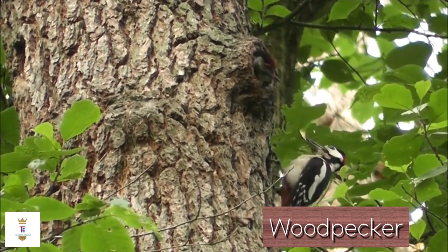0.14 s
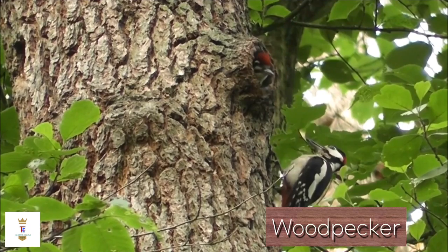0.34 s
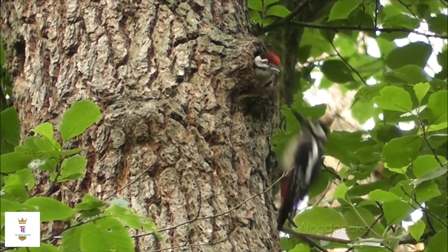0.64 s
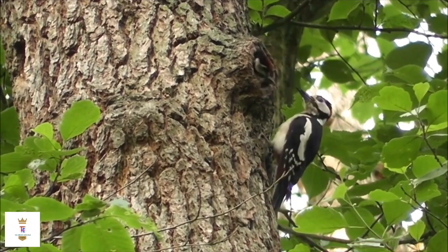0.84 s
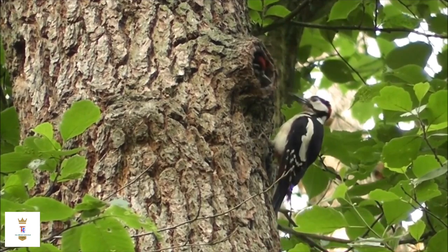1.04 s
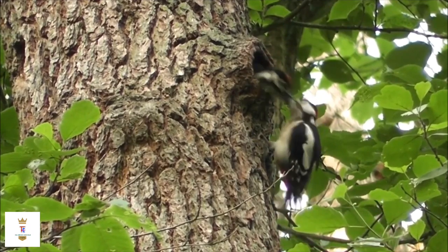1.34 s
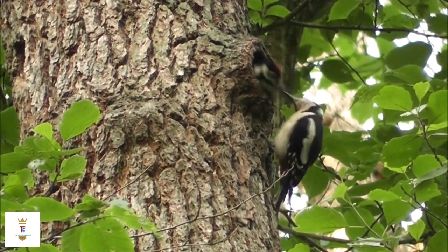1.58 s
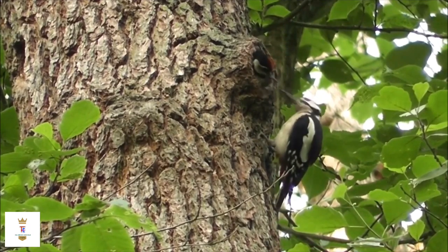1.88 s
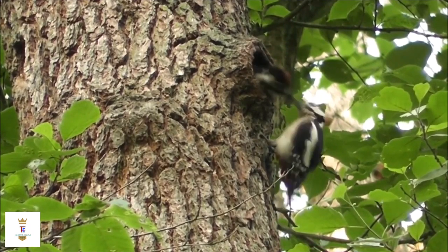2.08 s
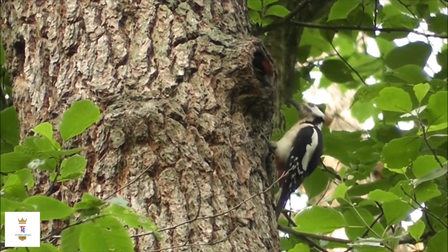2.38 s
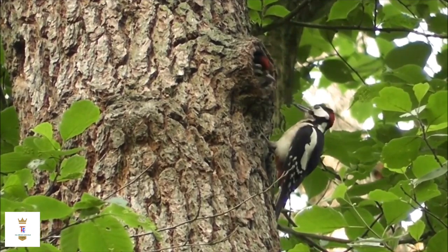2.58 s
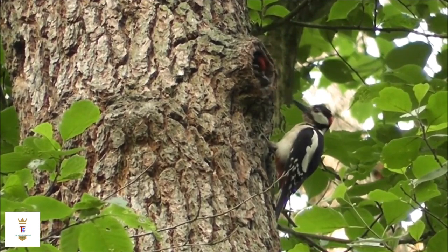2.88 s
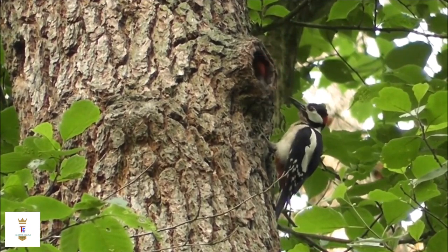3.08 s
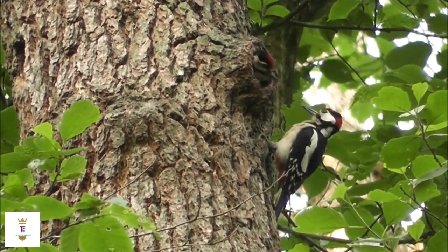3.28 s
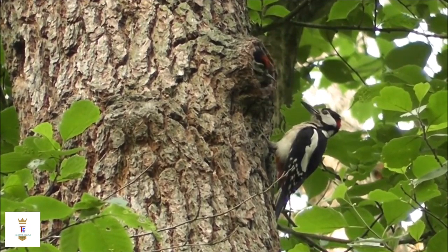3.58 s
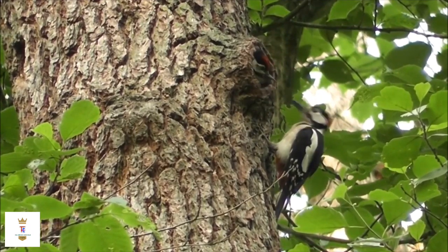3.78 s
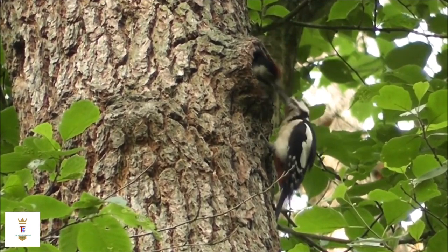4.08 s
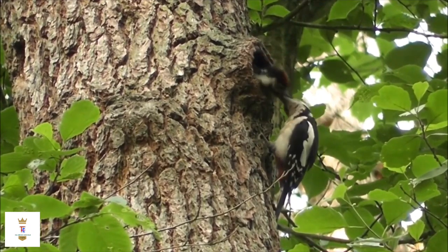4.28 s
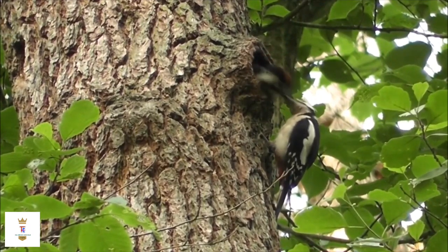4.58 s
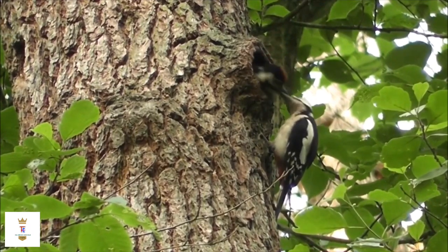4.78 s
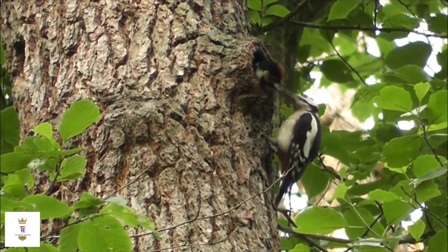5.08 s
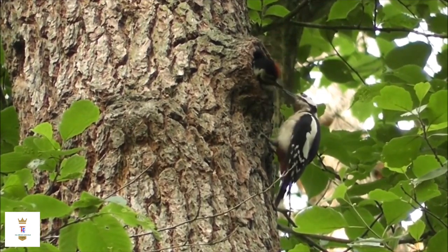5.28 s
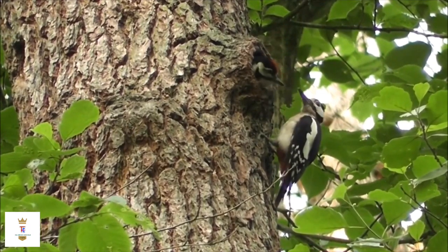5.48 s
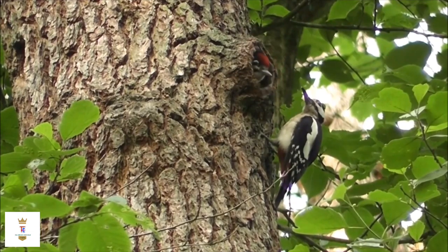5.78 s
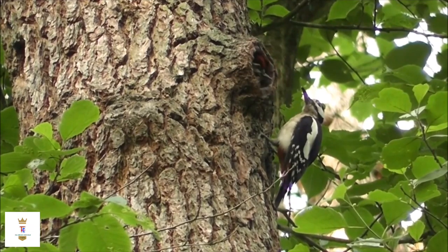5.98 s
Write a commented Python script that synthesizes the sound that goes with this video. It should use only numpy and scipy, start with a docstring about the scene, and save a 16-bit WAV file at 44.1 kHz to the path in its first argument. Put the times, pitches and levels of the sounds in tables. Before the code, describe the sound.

A woodpecker chick begs with sharp, rapid, repeated calls in a wood, while a distant songbird whistles over softly rustling leaves.

```python
"""Woodpecker chick in a wood

A chick begs from its nest hole, nearly four calls a second: syrinx tension swells and lets go, so each
sharp call arches in pitch. Now and then its voice cracks. Further off a songbird whistles a phrase and
later a few faint chirps. Trunks and foliage scatter every call into a long tail over a soft hush."""
import sys
import numpy as np
from scipy import signal
from scipy.fft import rfft, irfft, next_fast_len
from scipy.io import wavfile
from scipy.ndimage import map_coordinates

SR = 44100
rng = np.random.default_rng(int(sys.argv[2]) if len(sys.argv) > 2 else 0)


def output_pcm(signal):
    """Save a mono or channel-first signal as 16-bit PCM at the path in sys.argv[1].

    Samples are clipped to [-1, 1] before scaling.
    """
    pcm = np.clip(np.atleast_2d(signal).T, -1, 1) * 32767
    wavfile.write(sys.argv[1], SR, np.round(pcm).astype(np.int16))


N = 270774
TOP_HZ = 15750  # upper band limit
CALL_SAMPLES = int(.2 * SR)  # room for one whole call

# Resonances of throat and bill: (frequency [Hz], gain [dB])
THROAT = [(500, -39), (1150, -10), (2400, -2.5), (3500, -0.5), (5000, -6.5), (5800, -3), (6900, 0),
          (7800, 0), (10000, -4.5), (12500, -12), (15500, -26), (19000, -52)]


def amp(db):
    """Decibels to amplitude ratio."""
    return 10 ** (np.asarray(db) / 20)


def unit(x):
    """Normalisation to rms 1."""
    return x / np.sqrt(np.mean(x ** 2) + 1e-20)


def along(points, hz):
    """Interpolation of a table on a logarithmic frequency axis."""
    frequencies, values = np.transpose(points)
    return np.interp(np.log(hz + 1), np.log(frequencies + 1), values)


def wobble(t, rate):
    """Random modulation: a smooth curve with rate knots a second."""
    return map_coordinates(rng.standard_normal(512), [(t - t[0]) * rate], mode="wrap")


def filtered(x, response):
    """Linear filtering: the spectrum times a frequency response."""
    size = next_fast_len(N + SR // 2)
    return irfft(rfft(x, size) * response(np.fft.rfftfreq(size, 1 / SR)), size)[..., :N]


def add(track, s, sound):
    """Superposition of a sound on the track from time s."""
    start = max(round(s * SR), 0)
    part = track[..., start:start + sound.shape[-1]]
    part += sound[..., :part.shape[-1]]


def air(spectrum, db, sway_db):
    """Partial coherence: swaying outdoor noise, partly alike on left and right."""
    # Likeness of the two sides: (frequency [Hz], coherence [ratio])
    coherence = [(30, .9), (90, 0.88), (180, 0.88), (350, 0.4), (700, 0.03), (1400, 0.72), (3000, 1),
                 (8000, 1), (13000, 0.39)]

    def response(hz):
        angle = np.arccos(np.clip(along(coherence, hz), -1, 1)) / 2
        return amp(along(spectrum, hz)) * [np.cos(angle), np.sin(angle)]

    mid, side = filtered(rng.standard_normal((2, N)), response)
    sway = wobble(np.arange(N) / SR, 3.004)
    return unit(np.array([mid + side, mid - side])) * amp(db + sway_db * sway)


def hush():
    """Broadband noise: distant rumble and leaves are independent, so their powers add."""
    # Distant rumble: (frequency [Hz], relative spectral density [dB])
    rumble = [(15, -44), (25, -17), (85, 0), (156, -5.5), (189, 0.5), (252, 0), (320, -3), (355, -1),
              (432, -5.5), (900, -19), (1170, -93), (1980, -120)]
    # Rustling leaves: (frequency [Hz], relative spectral density [dB])
    leaves = [(200, -19), (600, -2.5), (1200, -4.5), (2400, 1.5), (4000, 0), (7000, -4.5), (10000, -28),
              (15500, -23)]
    return air(rumble, db=-64.5, sway_db=1.0) + air(leaves, db=-55.5, sway_db=1.7)


def in_wood(ahead, all_round, near_db, near_t60, far_db):
    """Scattering: sound sent ahead gains quick echoes off bark and leaves; that sent all round, a tail."""
    # Reverberation of the wood: (frequency [Hz], time to fall 60 dB [s])
    decay = [(1000, 0.13), (3000, 1), (5000, 0.68), (7500, 0.6), (10000, 0.56), (15000, 0.49)]
    # Initial spectrum of the tail: (frequency [Hz], relative level [dB])
    colour = [(1000, 3.5), (2400, -2.5), (3500, 1.5), (5000, 6.5), (7500, 0), (10000, -3), (15000, -3)]
    hz, t, noise = signal.stft(rng.standard_normal(SR * 3 // 4), SR, nperseg=256)
    tail_db = along(colour, hz)[:, None] - 60 * t / along(decay, hz)[:, None]
    far = signal.istft(noise * amp(tail_db), SR, nperseg=256)[1]
    t = np.arange(len(far)) / SR
    # cubed noise: a few strong echoes among many weak
    scatter = lambda t60: rng.standard_normal(len(t)) ** 3 * amp(-60 * t / t60)
    at_level = lambda echo, db: amp(db) * echo / np.linalg.norm(echo)
    near = at_level(scatter(near_t60), near_db) + at_level(scatter(t60=.0067), db=-15)
    near[0] += 1  # the direct path
    tail = at_level(far * (1 - np.exp(-t / .0073)), far_db)
    mid = signal.fftconvolve(ahead, near) + signal.fftconvolve(all_round, tail)
    side = signal.fftconvolve(ahead, at_level(scatter(near_t60), near_db - 22))
    return np.array([mid + side, mid - side])


def songbird(gain_db=.3, drop_s=.025, climb_share=.52, swell_db=3):
    """Gliding pure tones; the direct-to-reverberant ratio falls for fainter, more distant notes."""
    # Slurs: (time [s], length [s], start pitch [Hz], target pitch [Hz], relative level [dB])
    slurs = [(0, .02, 5900, 5500, -46), (.095, .045, 3360, 3520, -41.5), (.138, .022, 3560, 3680, -32),
             (.227, .03, 2795, 3150, -39), (.63, .057, 1950, 1760, -53), (.782, .07, 2825, 3130, -35),
             (.855, .05, 3180, 2776, -38), (.94, .12, 3230, 3530, -38), (1.115, .06, 5600, 4010, -40.5),
             (1.268, .055, 3800, 3345, -37), (1.483, .068, 3847, 2815, -37),
             (1.55, 0.052, 2780, 3090, -37.5), (1.754, .072, 3950, 3646, -33),
             (1.9, 0.11, 2900, 3340, -35.5), (2.072, 0.036, 3780, 3480, -33.5),
             (2.255, 0.049, 2803, 2808, -35), (2.31, 0.064, 2860, 3330, -39),
             (5.55, 0.028, 3860, 3745, -53), (5.6, .076, 5730, 5520, -56), (5.605, 0.053, 2950, 3180, -59),
             (5.845, .055, 5000, 3880, -50), (6.04, 0.025, 4000, 3880, -51)]
    out = np.zeros((2, N))
    for s, length, start_hz, target_hz, db in slurs:
        t = np.arange(int(length * SR)) / SR
        slide_s = drop_s if target_hz <= start_hz else climb_share * length
        settled = 1 - np.exp(-(t / slide_s) ** 2)
        pitch = start_hz + (target_hz - start_hz) * settled
        phase = 2 * np.pi * np.cumsum(pitch * (1 + .003 * wobble(t, 225))) / SR
        swell = signal.windows.tukey(len(t), .25) * amp(swell_db * (settled - 1))
        whistle = swell * amp(2.6 * wobble(t, 119)) * np.sin(phase)
        echo_db = .28 * (-33.5 - db)  # grows as a note falls below the nearest ones
        note = in_wood(whistle, whistle, near_db=echo_db - 8.5, near_t60=.15, far_db=echo_db - 3)
        add(out, s, amp(db + gain_db) * note)
    return out * amp([[-.5], [.5]])  # slightly to the right


def harmonic(k, phase):
    """The k-th partial of a harmonic series, at a random phase."""
    return np.sin(k * phase + rng.uniform(0, 2 * np.pi))


def rasp(phase):
    """Turbulence chopped once a cycle by the syrinx and filtered by the throat, rms 1."""
    puffs = rng.standard_normal(CALL_SAMPLES)[:len(phase)] * (1 + np.cos(phase))
    throat = amp(along(THROAT, np.fft.rfftfreq(len(phase), 1 / SR)))
    return unit(irfft(rfft(puffs) * throat, len(phase)))


def squeak(length, pitches, overtone_db, fade_db=0, jitter=.075):
    """Irregular oscillation of the slack syrinx: a short note bending through three pitches."""
    t = np.arange(max(int(length * SR), 16)) / SR
    u = t / t[-1]
    pitch = np.polyval(np.polyfit([0, .5, 1], pitches, 2), u)
    loose = (1400 / pitches[1]) ** 3  # low squeaks are scratchy, high ones clear
    phase = 2 * np.pi * np.cumsum(pitch * (1 + jitter * loose * wobble(t, 1060))) / SR
    fundamental = amp(along(THROAT, pitch) + 6.5) * np.sin(phase)
    overtones = np.zeros(len(t))
    for k in range(2, 8):
        gain = amp(along(THROAT, k * pitch) + 1.2 * (3 - k)) * 2.67 / k
        overtones += gain * (k * pitch < TOP_HZ) * harmonic(k, phase)
    scratch = amp(-7) * loose * rasp(phase)
    gate = np.sin(np.pi / 2 * np.clip(np.minimum(u, 1 - u) / .092, 0, 1)) ** 2
    fade = amp(fade_db * (1 / 3 - t / length))
    return gate * fade * (fundamental + amp(overtone_db) * (overtones + scratch))


def cracked_calls(open_s=.019, close_s=.026):
    """A voice break: a squeak, a thin whistle in place of the loud arch, and a falling squeak."""
    # Cracked calls: (time [s], length [s], opening pitch [Hz], top pitch [Hz],
    # opening gain [dB], middle gain [dB], closing gain [dB])
    cracks = [(.204, .09, 1600, 2434, -51, -55, -49), (1.651, 0.068, 1750, 2410, -47, -44, -49.5),
              (3.029, .049, 1544, 2435, -56, -47, -46.5), (4.229, .08, 3520, 2560, -46, -55, -53)]
    # Pitch bends of the three parts: (start [ratio], middle [ratio], end [ratio])
    bends = [
        [.98, 0.98, 1],
        [0.87, 0.98, 0.84],
        [1, .84, .6],
    ]
    open_bend, middle_bend, close_bend = np.array(bends)
    out = np.zeros((2, N))
    for s, length, open_hz, top_hz, open_db, middle_db, close_db in cracks:
        purer_db = .005 * (open_hz - 1500)  # higher openings lose overtones
        opening = squeak(open_s, open_hz * open_bend, overtone_db=6 - purer_db)
        whistle = squeak(length - open_s, top_hz * middle_bend, overtone_db=-5.5, jitter=.07)
        closing = squeak(close_s, top_hz * close_bend, overtone_db=5)
        voice = np.zeros(CALL_SAMPLES)
        add(voice, 0, amp(open_db) * opening)
        add(voice, open_s / 2, amp(middle_db) * whistle)
        add(voice, length - close_s, amp(close_db) * closing)
        add(out, s, in_wood(voice, voice, near_db=-4, near_t60=.082, far_db=-5))
    return out


def catch(top_hz, db, usual_db=-54):
    """Onset transient: an abrupt, fading squeak, higher and brighter when harder."""
    # Pitch bend: (start [ratio], middle [ratio], end [ratio])
    bend = [1.18, 0.99, 1.15]
    force_db = db - usual_db
    pitches = top_hz * (.57 + .007 * force_db) * np.array(bend)
    return amp(db) * squeak(.018, pitches, overtone_db=1 + .6 * force_db, fade_db=9)


def arch(top_hz, rise, fall, levels, usual, strain, flutter_db=2.9, echo_share=.68):
    """Source and filter: syrinx tension arches the pitch, sweeping harmonics through throat resonances."""
    t = np.arange(-1.3 * rise, 1.7 * fall, 1 / SR)  # zero at the top
    rising = t < 0
    u = t / np.where(rising, rise, fall)
    sag = np.where(rising, .19, .205) * u ** 2 + .12 * u ** 6
    slack = np.minimum(sag, np.where(rising, .36, .5))
    jitter = .0036 * strain + .043 * slack  # the slack membrane is rougher
    pitch = top_hz * (1 - slack) * (1 + jitter * wobble(t, 1490))
    phase = 2 * np.pi * np.cumsum(pitch) / SR
    # a call departs from the usual voice most at its top, and less in its echo
    departure = np.array([[1], [echo_share]]) * np.maximum(1 - slack / .59, 0)
    voice = np.zeros((2, len(t)))
    for k in range(1, 10):
        row = min(k, len(levels)) - 1
        source_db = usual[row] + departure * (levels[row] - usual[row])
        throat_db = along(THROAT, k * pitch) - along(THROAT, (row + 1) * top_hz)
        slack_db = (-19 + 3.5 * max(k - 3, 0)) * slack  # softer but buzzier
        db = source_db + throat_db + slack_db + flutter_db * wobble(t, 260)
        voice += amp(db) * (k * pitch < SR / 2) * harmonic(k, phase)
    gate = np.interp(u, [-1.3, -.98, -.74, .95, 1.28, 1.3], [.08, .23, .72, .78, .21, .14])
    rasp_db = usual.max() - 28 + 11 * np.minimum(abs(u), 1)
    hoarse = strain * amp(rasp_db) * rasp(phase)
    return t[0], gate * amp(-1.14 * u) * (voice + hoarse)


def chick(gain_db=1, usual_hz=2499, rise_share=.52, catch_lead_s=.0195):
    """Voiced sound of the syrinx: each beg is a scratchy catch, a loud arch and a low closing flick."""
    # Begging calls: (time of the top [s], top pitch [Hz], nominal length [s], body [dB],
    # shrillness [dB], hoarseness [ratio], relative catch level [dB])
    begs = [(.056, 2455, 0.05, -2, 1, 1, -57), (.515, 2575, .046, 1, 7.5, .8, -54),
            (.764, 2358, .049, 2.5, 1, .9, -60), (.997, 2418, .05, 1.5, 3, 1, -60),
            (1.217, 2510, 0.057, -.5, 2, 1.8, -54), (1.453, 2624, .056, -2, 2.5, 1.1, -54),
            (1.963, 2498, 0.061, -0.5, 3, 1.3, -64), (2.235, 2451, .054, -1.5, -2, 1.2, -62),
            (2.478, 2512, .056, 0, -12.5, 1.1, -55), (2.76, 2493, 0.042, -2, 1, .8, -52.5),
            (3.259, 2623, 0.045, -2.5, 1.3, .8, -56.5), (3.516, 2567, 0.055, -0.5, 1, 2.4, -49),
            (3.825, 2492, .05, -3.5, 4, 1, -54), (4.076, 2453, .061, -2.5, 1, 1.3, -58),
            (4.553, 2572, .07, 1.5, 0, 2, -51), (4.847, 2380, 0.066, 1, -.5, 1.8, -63),
            (5.117, 2397, 0.062, 4.5, -8, 1.8, -52), (5.406, 2394, 0.051, -.5, -3, 1.2, -57),
            (5.697, 2420, 0.048, 0, -3.5, 1, -62), (5.937, 2636, .044, 2.5, 7, 1.1, -47)]
    # Usual voice, harmonics 1 to 5: (relative level [dB], change with pitch [dB/Hz])
    partials = [(-37.6, -0.012), (-36.2, 0.0432), (-29.2, 0.0016), (-38.8, -.018), (-49.8, -.004)]
    usual, db_per_hz = np.transpose(partials)
    flick_bend = np.array([.66, .54, .496])  # ratios to the top pitch
    out = np.zeros((2, N))
    for s, top_hz, length, body_db, shrill_db, strain, catch_db in begs:
        rise, fall = length * rise_share, length * (1 - rise_share)
        top_s = catch_lead_s + rise
        timbre_db = np.where(np.arange(len(usual)) < 2, body_db, shrill_db)
        levels = usual + db_per_hz * (top_hz - usual_hz) + timbre_db
        offset_s, call = arch(top_hz, rise, fall, levels, usual, strain)
        voice = np.zeros((2, CALL_SAMPLES))  # sent ahead, sent all round
        add(voice, 0, amp(gain_db) * catch(top_hz, catch_db))
        add(voice, top_s + offset_s, amp(gain_db) * call)
        add(voice, top_s + fall, amp(-57) * squeak(.021, top_hz * flick_bend, overtone_db=-3))
        add(out, s - top_s, in_wood(*voice, near_db=-7, near_t60=.11, far_db=-6))
    return out


def scene():
    """Superposition of the chick, the songbird and the hush of the wood."""
    return chick() + cracked_calls() + songbird() + hush()


def record(dry):
    """Band limiting: an ideal low-pass filter at TOP_HZ."""
    return filtered(dry, lambda hz: hz < TOP_HZ)


dry = scene()
out = record(dry)
output_pcm(out)
```